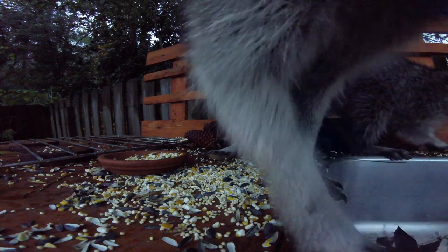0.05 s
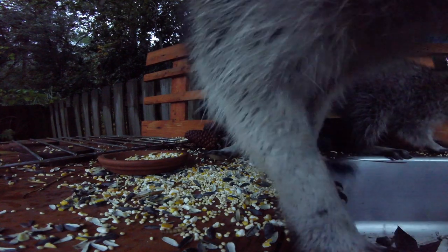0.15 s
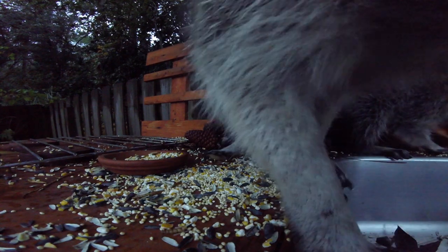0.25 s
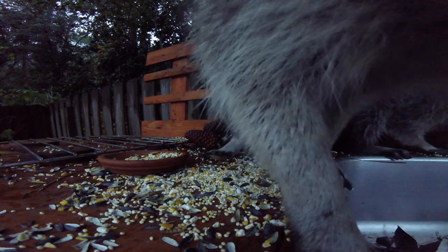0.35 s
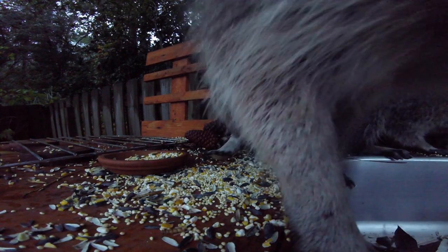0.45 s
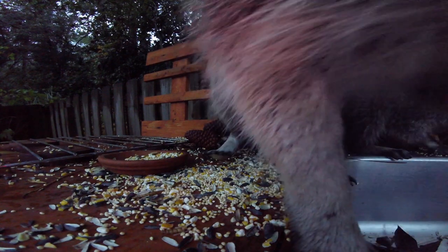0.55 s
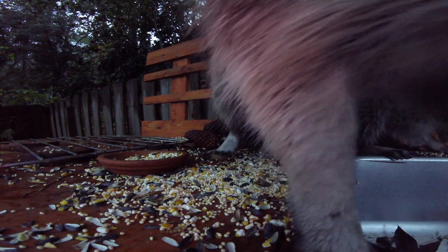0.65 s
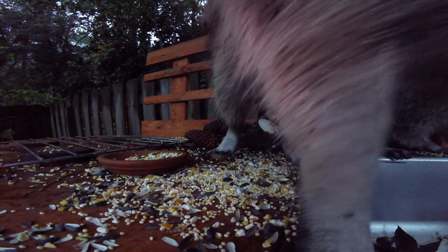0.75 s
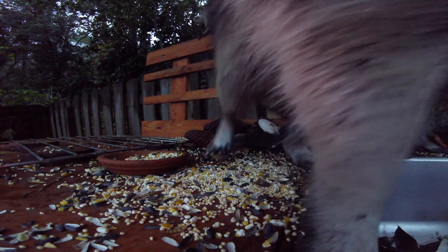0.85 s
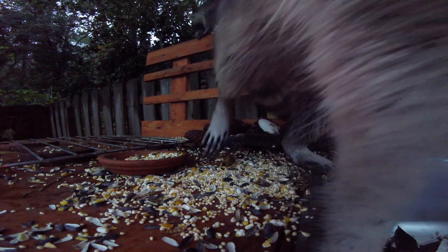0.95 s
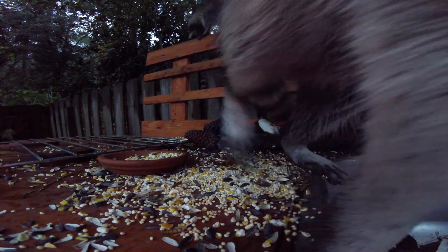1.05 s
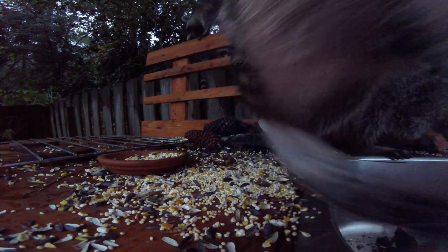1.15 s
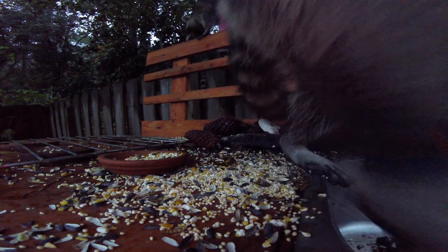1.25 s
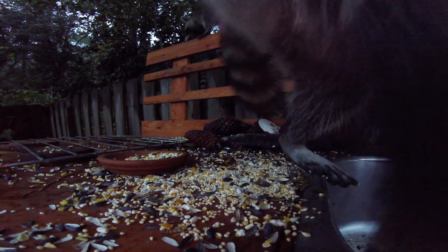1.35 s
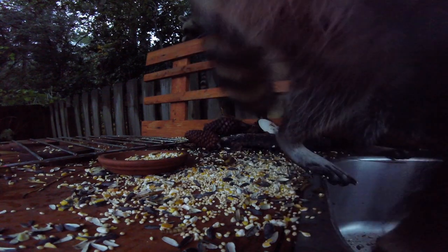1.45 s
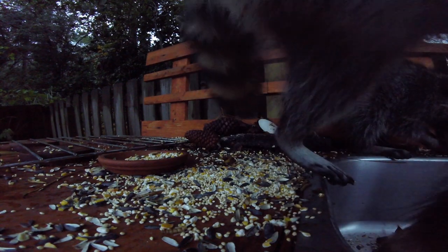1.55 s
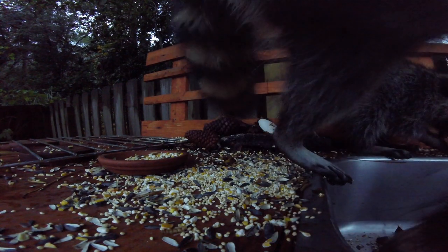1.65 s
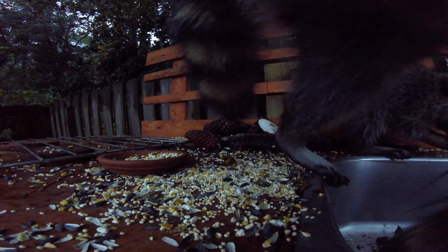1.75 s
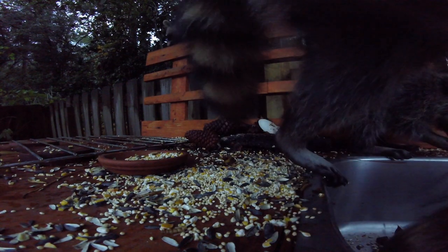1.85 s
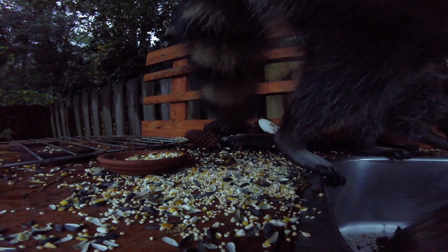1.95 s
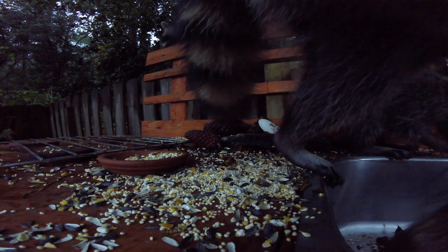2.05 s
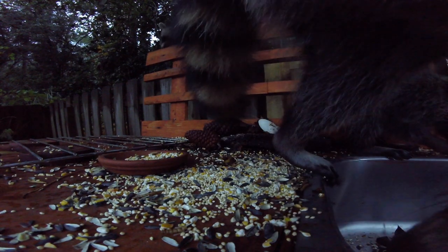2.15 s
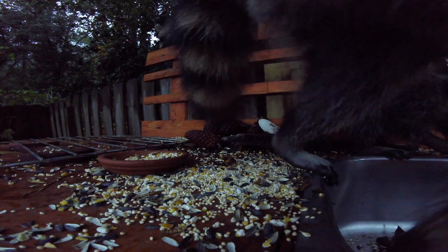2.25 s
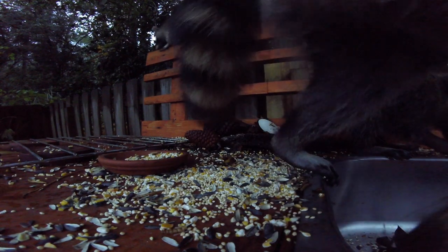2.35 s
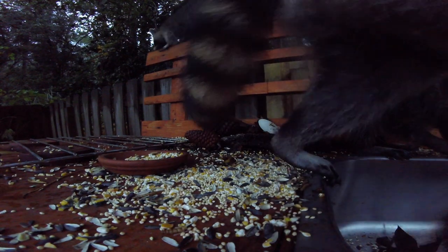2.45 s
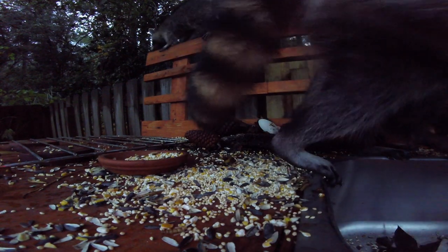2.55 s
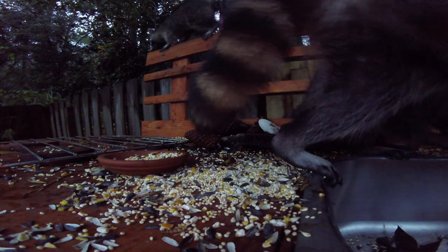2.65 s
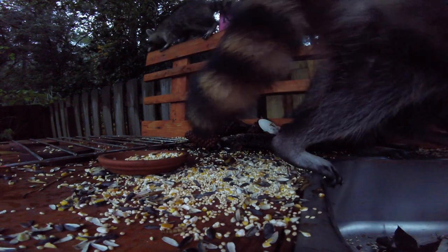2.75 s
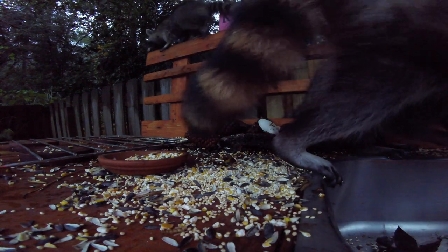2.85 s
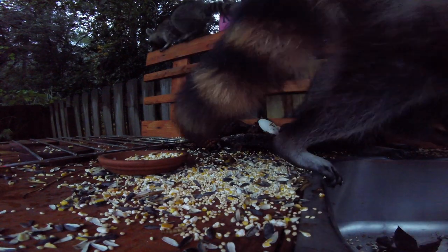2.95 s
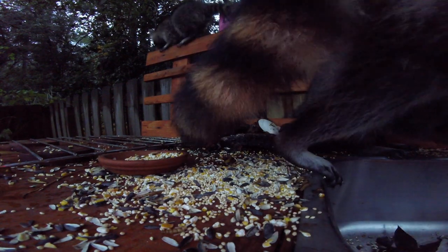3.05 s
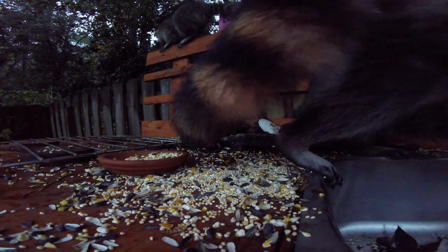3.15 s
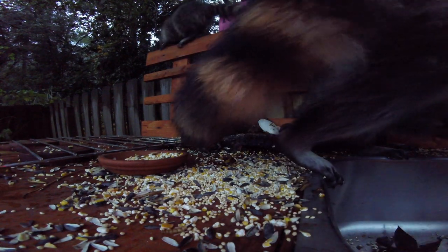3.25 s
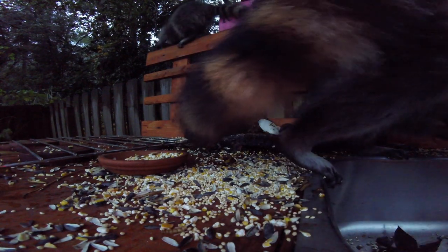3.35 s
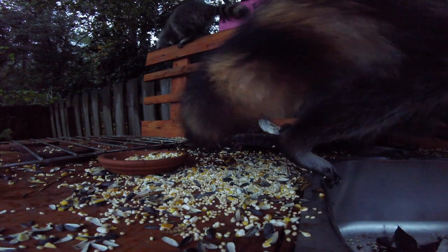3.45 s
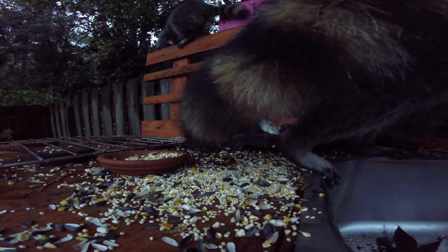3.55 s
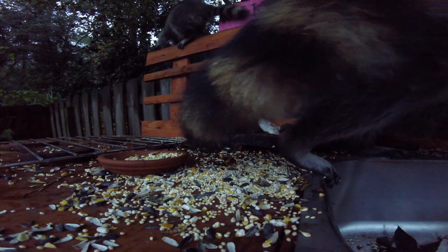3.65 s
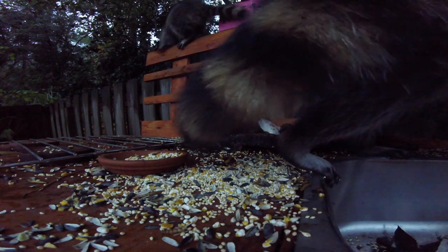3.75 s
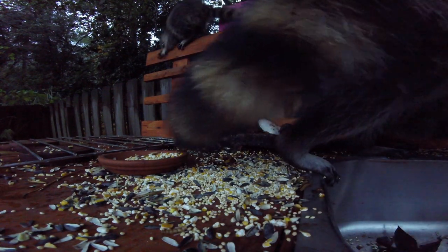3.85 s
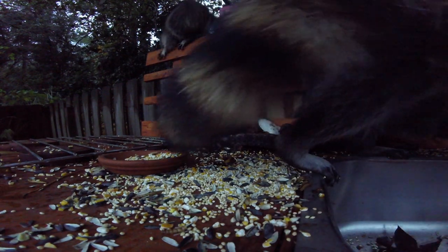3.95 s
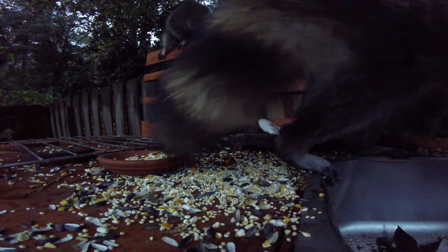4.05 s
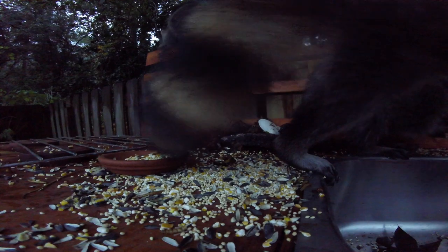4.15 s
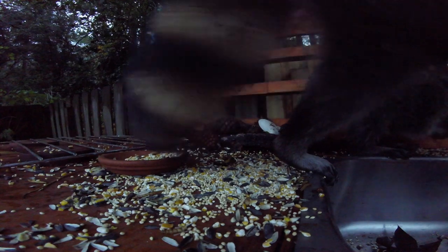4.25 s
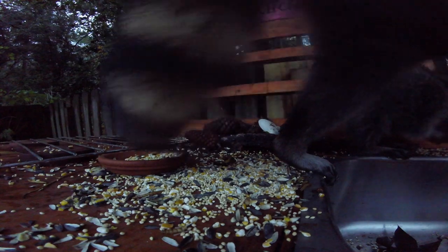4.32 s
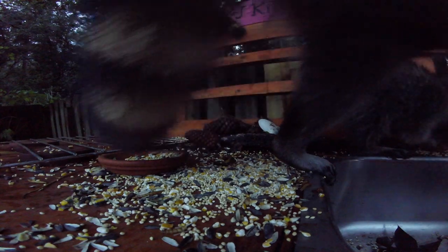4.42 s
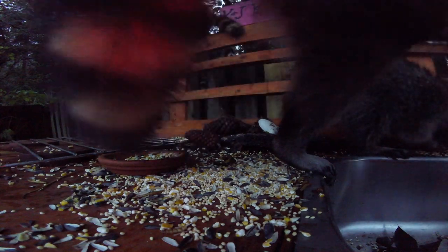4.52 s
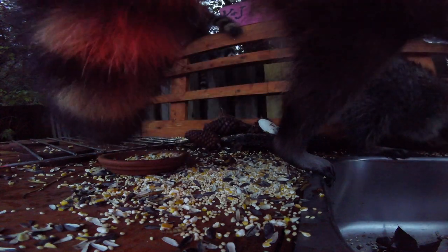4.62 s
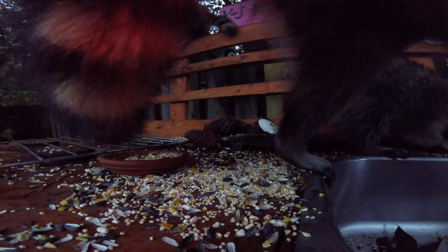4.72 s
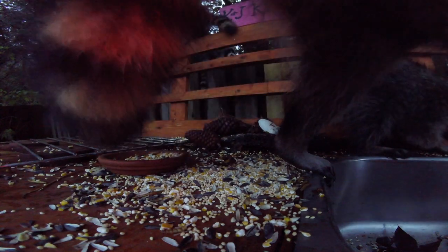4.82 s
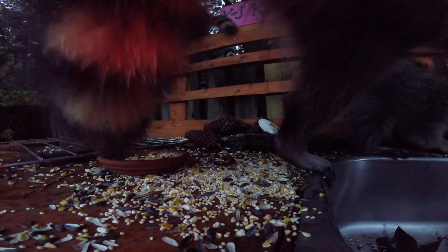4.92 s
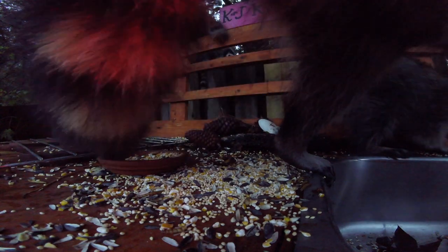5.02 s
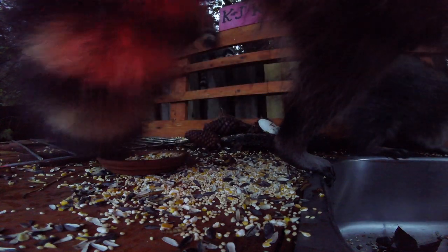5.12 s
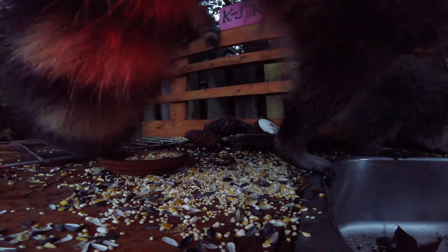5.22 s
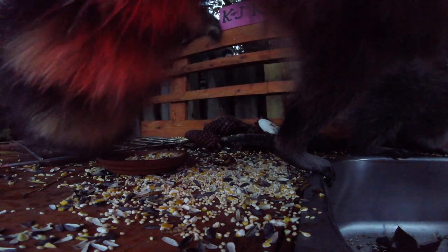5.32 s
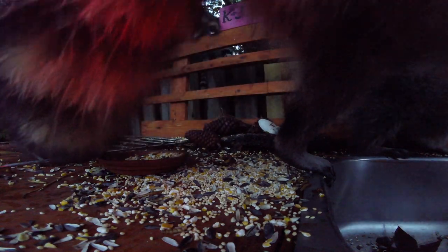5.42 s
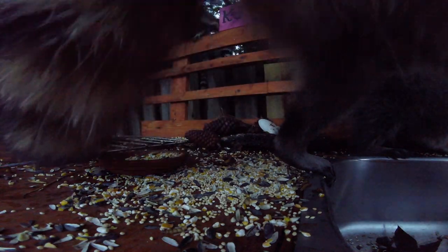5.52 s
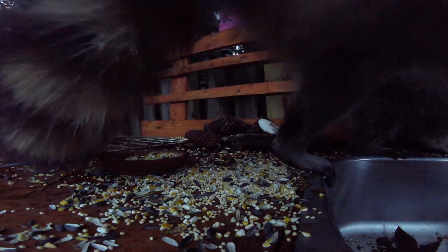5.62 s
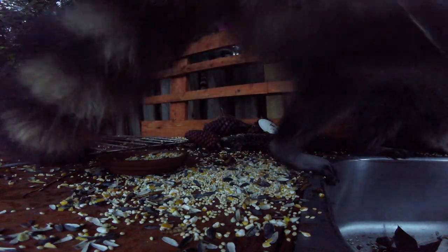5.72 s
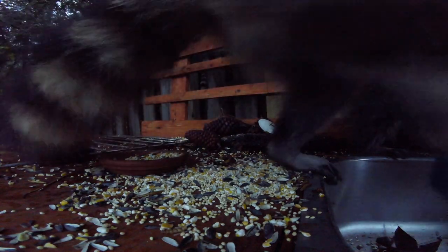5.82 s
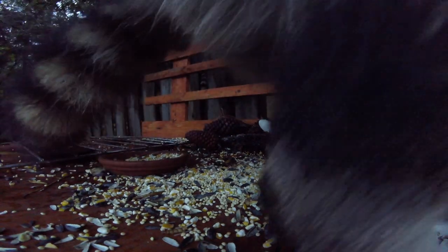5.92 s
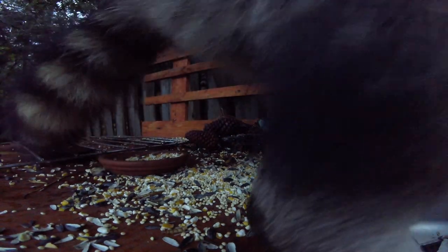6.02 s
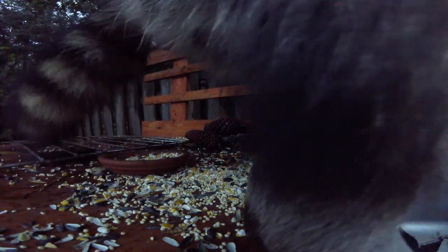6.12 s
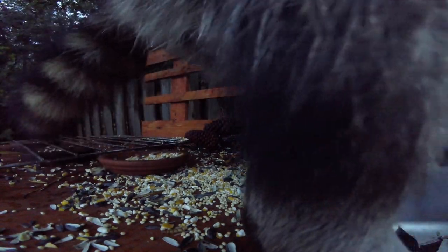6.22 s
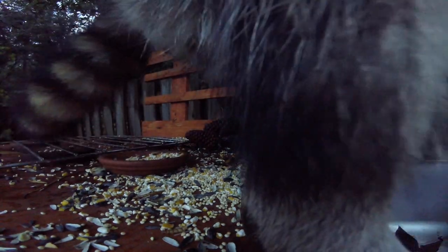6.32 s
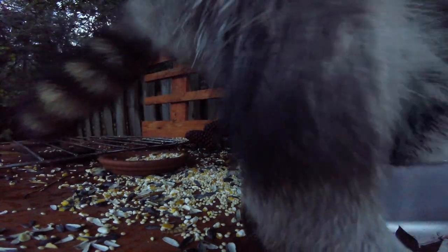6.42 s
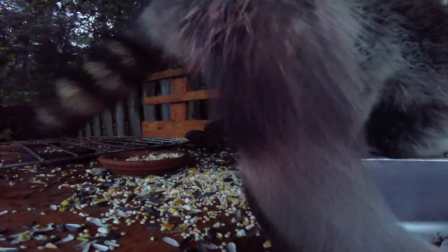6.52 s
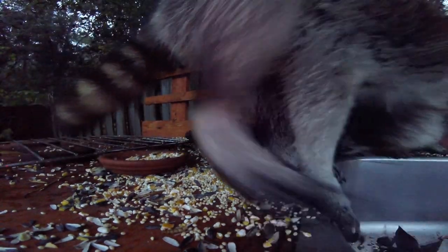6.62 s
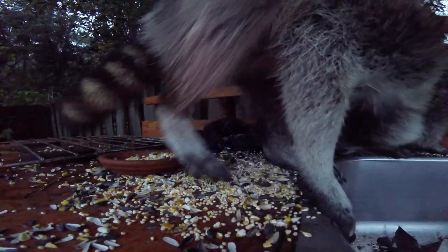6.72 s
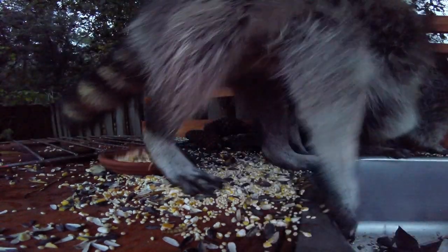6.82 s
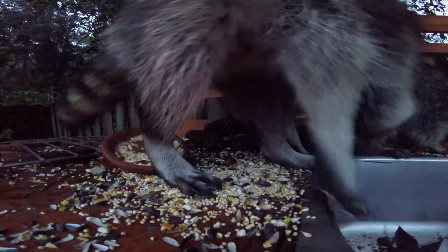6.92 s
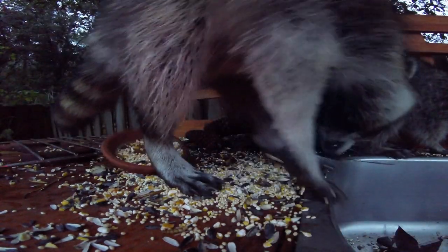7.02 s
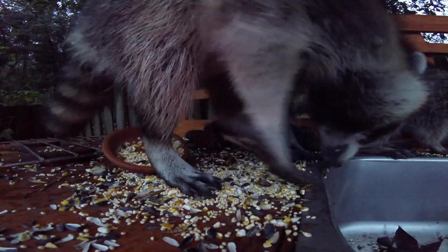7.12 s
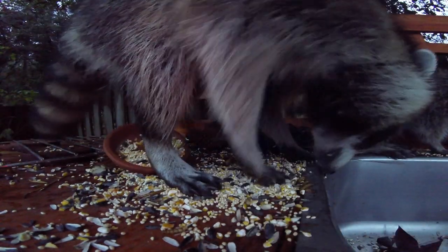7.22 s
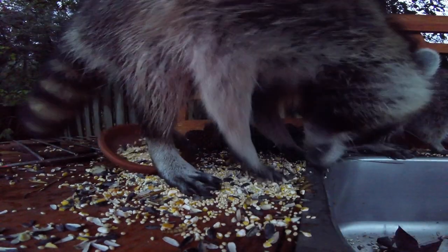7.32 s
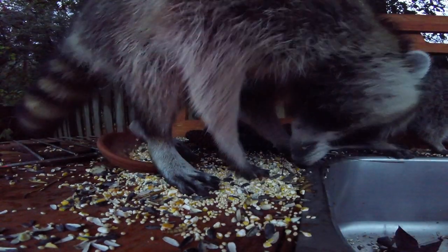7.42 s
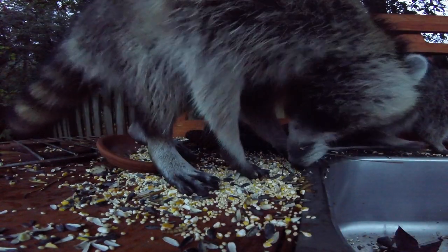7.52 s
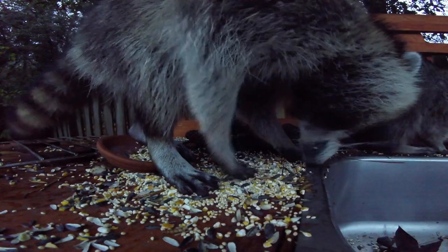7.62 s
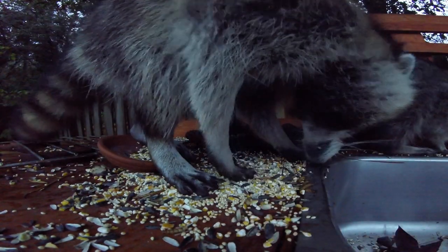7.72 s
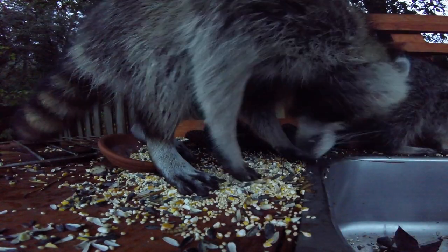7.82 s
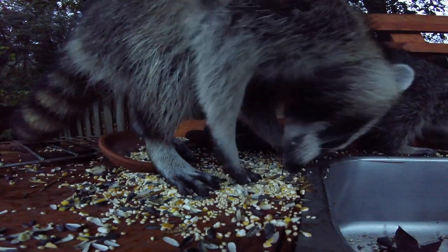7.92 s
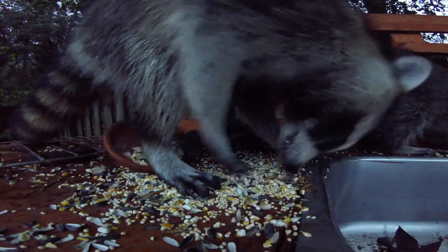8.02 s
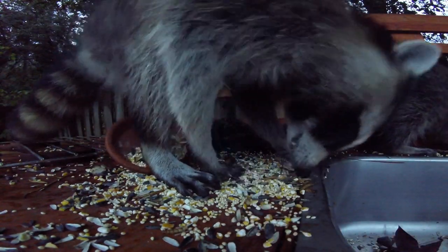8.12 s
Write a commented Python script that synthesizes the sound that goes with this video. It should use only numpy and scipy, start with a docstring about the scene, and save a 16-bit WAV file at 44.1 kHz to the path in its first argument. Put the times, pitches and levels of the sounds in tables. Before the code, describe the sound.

Outdoors on a wooden deck, paws make muffled bassy thumps while seeds snap, tick and rustle right beside the microphone. The opening seed spill rattles lightly in a steel tray; the middle is quieter and sparse. Later, stronger footfalls and claws clank the tray, with barely audible squeaks, before rustling settles. The sound is mono, dry and slightly treble-coloured.

```python
"""Raccoons foraging on a deck

Raccoons forage in birdseed on a wooden deck, close to a small microphone that stands on the boards.
Paws thump the deck as swinging, decaying tones; claws knock a steel tray and ring its modes; it also squeaks.
Seeds crack as bursts of spiky noise, tick as short tones and rustle as dense tiny grains.
Distant rumble and evening air are coloured noise; the microphone port colours everything."""
import sys
import numpy as np
from scipy import signal
from scipy.fft import rfft, irfft
from scipy.io import wavfile
from scipy.ndimage import uniform_filter1d

SR = 44100
rng = np.random.default_rng(int(sys.argv[2]) if len(sys.argv) > 2 else 0)


def persist_wave(psi):
    """Save psi, clipped to +-1, as 16-bit WAV."""
    counts = np.round(np.clip(psi, -1, 1) * 32767).astype(np.int16)
    wavfile.write(sys.argv[1], SR, np.atleast_2d(counts).T)


N = 360297  # length of the scene in samples

# ways the steel tray vibrates: [f/Hz, relative level/dB, time to fall 60 dB/s]
TRAY_MODES = [(275, -12, .06), (289, -26, .42), (445, 0, .045), (360, -12, .05), (590, -12, .05),
              (845, -22, .08), (950, -25, .05), (1240, -29, .06), (1500, -28, .06), (2300, -31, .04),
              (2800, -30, .04)]


def undb(db):
    """Turn decibels into an amplitude factor."""
    return 10 ** (np.asarray(db) / 20)


def unit(x):
    """Scale a sound to an average (RMS) level of 1."""
    return x / np.sqrt(np.mean(x ** 2))


def add(out, start_s, sound):
    """Mix a sound in from the given time."""
    i = max(int(start_s * SR), 0)
    out[i:i + len(sound)] += sound[:len(out) - i]


def fall_60db(t, t60):
    """Exponential decay that drops 60 dB in t60 seconds."""
    return np.exp(-np.log(1000) * t / max(t60, .003))


def ring(hz, t60, seconds=.6):
    """One way of vibrating: a sine that dies away."""
    t = np.arange(int(seconds * SR)) / SR
    return np.sin(2 * np.pi * hz * t) * fall_60db(t, t60)


def ring_modes(modes):
    """A solid object rings in several modes at once."""
    return sum(undb(db) * ring(hz, t60) for hz, db, t60 in modes)


def struck(sound, contact_s):
    """A softer blow pushes longer and rings fewer highs; the result peaks at 1."""
    push = np.hanning(max(int(contact_s * SR), 1) + 2)[1:-1]
    y = signal.fftconvolve(sound, push)
    return y / np.max(np.abs(y))


def band(x, lo_hz, hi_hz):
    """Keep only the frequencies between two limits."""
    return signal.sosfilt(signal.butter(2, [lo_hz, hi_hz], "band", fs=SR, output="sos"), x)


def high_pass(x, order, hz):
    """Cut the frequencies below a limit."""
    return signal.sosfilt(signal.butter(order, hz, "high", fs=SR, output="sos"), x)


def walk(rate):
    """Random levels, each held 1 / rate seconds, then smoothed twice into slow swells."""
    hold = int(SR / rate)
    steps = np.repeat(rng.standard_normal(N // hold + 1), hold)
    smooth = uniform_filter1d(uniform_filter1d(steps, hold), hold)
    return unit(smooth[:N])


def paws():
    """The weight comes on over a cycle or two; the boards swing until the paw settles and damps them."""
    # paws set down: [t/s at about mid-rise, peak level/dB, f/Hz, swing time/s]
    steps = [(0.017, -36, 53, .075), (0.153, -31, 53.2, .06), (0.736, -32.5, 62.4, 0.08),
             (0.974, -41.5, 38.7, 0.058), (1.062, -40, 68.4, 0.046), (1.185, -38, 71.6, 0.042),
             (1.272, -41, 54.4, 0.071), (1.536, -41, 62.6, 0.087), (2.085, -37, 70.2, 0.082),
             (3.15, -47, 44.7, 0.073), (3.34, -39, 43, 0.14), (3.426, -41.5, 44.6, 0.048),
             (3.864, -38.5, 67, .03), (4.119, -41.5, 70, 0.042), (4.534, -40.5, 55.4, 0.053),
             (4.86, -45, 38.2, .09), (5.513, -43.5, 61.2, 0.07), (5.894, -22.5, 77, 0.02),
             (5.916, -28.5, 58.4, 0.027), (6.567, -38.5, 63, 0.086), (6.826, -24.5, 68.6, 0.1),
             (7.163, -32.5, 64.6, 0.029), (7.228, -33.5, 61.4, 0.052), (7.389, -23.5, 64, 0.077),
             (7.685, -36, 63.7, 0.1), (8.04, -38.5, 64, 0.078)]
    # ways the deck boards vibrate: [f/Hz, relative level/dB, time to fall 60 dB/s]
    deck_modes = [(62.4, 1, 0.41), (102, 6.5, 0.12), (121, 4, 0.099), (175, -30, 0.39)]
    rise_s = 0.0227
    out = np.zeros(N)
    boards = ring_modes(deck_modes)
    t = np.arange(len(boards)) / SR
    rise = 1 - np.exp(-(t / rise_s) ** 2)
    for s, db, hz, swing_s in steps:
        swing = np.sin(2 * np.pi * hz * t) * np.exp(-(t / swing_s) ** 2)
        thud = (0.72 * boards + swing) * rise
        add(out, s - rise_s / 2, undb(db) * thud / np.max(np.abs(thud)))
    return out


def pitched(table, t60, rough, spread):
    """Brief rings: a mode, a close neighbour and noise around them."""
    out = np.zeros(N)
    noise = rng.standard_normal((len(table), 6000))
    fade = fall_60db(np.arange(noise.shape[1]) / SR, t60)
    for (s, db, hz), n in zip(table, noise):
        grit = unit(band(n, hz / spread, hz * spread)) * fade
        pair = ring(hz, t60)[:len(n)] + 0.35 * ring(hz * 1.09, t60)[:len(n)]
        add(out, s, undb(db) * struck(pair + rough * grit, contact_s=0.00019))
    return out


def taps():
    """Dull taps on the wood ring with a lot of wide noise around the pitch."""
    # taps: [t/s, peak level/dB, f/Hz]
    tap_list = [(0.175, -41, 151), (0.273, -35, 818), (0.719, -36, 183), (2.309, -45.5, 220),
                (3.058, -48.5, 657), (3.408, -51, 234), (3.775, -50, 226), (3.785, -50, 477),
                (3.799, -55, 226), (3.858, -49.5, 325), (3.889, -48, 282), (4.201, -50.5, 594),
                (4.635, -49.5, 242.6), (4.865, -46, 198), (5.133, -49.5, 219), (5.89, -27.5, 148),
                (5.903, -39.5, 190), (6.577, -49.5, 728)]
    return pitched(tap_list, t60=0.15, rough=0.69, spread=1.98)


def tray_knocks():
    """Every knock rings the same modes, without deep bass: the claw clicks and loose seed jumps."""
    # claws on the tray rim: [t/s, peak level of the ringing/dB, contact length/s]
    knocks = [(6.8138, -34, 0.001), (6.8232, -23.5, 0.0033), (6.836, -33, 0.0011), (6.847, -22, 0.0028),
              (6.873, -40, 0.0014), (6.893, -36.5, .0012), (7.278, -38.5, 0.0017), (7.34, -42.5, .0012),
              (7.3624, -16.5, 0.0018), (7.3699, -14, 0.00059), (8.029, -46.5, 0.002),
              (8.147, -35.5, 0.00093)]
    out = np.zeros(N)
    modes = high_pass(ring_modes(TRAY_MODES), 4, 240)
    noise = rng.standard_normal((len(knocks), 6000))
    for (s, db, contact_s), n in zip(knocks, noise):
        add(out, s, undb(db) * struck(modes, contact_s))
        after = np.arange(len(n)) / SR
        click = unit(band(band(n, 900, 3200), 900, 3200)) * np.exp(-after / .003)
        jump = unit(band(n, 380, 1430)) * np.exp(-after / 0.03)
        add(out, s, undb(db) * (undb(-23) * click + undb(-33.0) * jump))
    return out


def tray_squeaks():
    """The tray squeaks faintly as it shifts: a narrow band of noise that throbs."""
    # squeaks: [t/s, f/Hz, level before fading and throbbing/dB, length/s]
    squeaks = [(6.89, 5350, -63, .02), (7.268, 5350, -63, .045), (7.27, 4400, -70, .07),
               (7.372, 5350, -65, .02), (7.37, 4400, -71, .04)]
    out = np.zeros(N)
    for s, hz, db, length in squeaks:
        t = np.arange(int(length * SR)) / SR
        throb = 1 + 0.3 * np.cos(2 * np.pi * 65 * t)  # the shaking deck opens and closes the contact
        scrape = unit(band(rng.standard_normal(len(t)), hz / 1.015, hz * 1.015))
        fade_in_out = np.sin(np.pi * t / length) ** .5
        add(out, s, undb(db) * fade_in_out * throb * scrape)
    return out


def crack_bursts(table):
    """Splinters: spiky noise with a sharp front and a weaker, longer tail; each husk has its own ring."""
    bright_db, duller_db_per_s = -17, 150  # longer cracks have less of the top part
    out = np.zeros(N)
    noise = rng.standard_normal((len(table), 2, 8000))
    t = np.arange(noise.shape[2]) / SR
    front = 1 - np.exp(-t / 0.00041)
    snap = 1.9 * np.exp(-t / 0.002)  # the husk splits
    for (s, db, low_db, hz, t60), (hiss, wander) in zip(table, noise):
        fall = np.log(1000) * t / max(t60, .004)
        shape = front * (snap + np.exp(-fall) + 0.37 * np.exp(-fall / 3))
        # random jumps in level make the noise spiky
        spikes_db = 2.94 * uniform_filter1d(wander, size=60) * np.sqrt(60)
        splinters = hiss * undb(spikes_db)
        middle = unit(band(splinters, 3980, 7440))
        husk_ring = 0.73 * unit(band(splinters, hz / 1.065, hz * 1.088))
        low = undb(low_db) * unit(band(splinters, 1240, 2980))
        top = undb(bright_db - duller_db_per_s * t60) * unit(band(splinters, 9400, 12900))
        burst = shape * (middle + husk_ring + low + top)
        add(out, s, undb(db) * burst / np.max(np.abs(burst)))
    return out


def cracks():
    """Seeds crack at set times, each as a burst of splinters."""
    # cracks: [t/s, peak level/dB, low part against the middle/dB, husk ring f/Hz, main 60 dB fall/s]
    crack_list = [(0.077, -41, 4, 5170, 0.021), (0.1315, -50, -10, 5030, .065),
                  (0.157, -56, -12, 4700, .045), (0.276, -24, -1, 5100, .065),
                  (0.281, -25.5, -11, 6400, 0.038), (0.305, -42, -5, 6400, 0.071),
                  (0.3367, -43, -5, 5000, .1), (0.362, -43, -5, 6450, 0.055),
                  (0.4058, -42, -1, 4670, 0.044), (0.4567, -47, -7, 5060, 0.072),
                  (0.6998, -51, -6, 5500, .045), (0.727, -49.5, -5, 5460, 0.039),
                  (0.965, -47, -1, 5400, 0.018), (0.9967, -48, -10, 5190, 0.03), (1.079, -49, 8, 3000, .03),
                  (1.156, -49, -1, 5650, .04), (1.1878, -38.5, -3, 4800, 0.047),
                  (1.3668, -50, -8, 5740, .035), (1.44, -51, 9, 3000, .03), (1.53, -53, -10, 4000, .03),
                  (1.5875, -55, -17, 2870, 0.03), (1.8053, -52, -12, 5100, .04),
                  (2.1924, -53, -15, 4530, .04), (2.802, -52, -13, 5700, 0.068),
                  (2.864, -38.5, -3.5, 2900, 0.065), (2.9476, -35, -12, 6600, 0.051),
                  (3.034, -46, 2, 5430, .035), (3.0605, -43.5, 0, 3400, 0.072),
                  (3.1188, -55, -14, 4500, .03), (3.133, -41, -2.5, 4800, 0.096),
                  (3.4301, -49.5, -17, 4870, 0.031), (3.6064, -50.5, -17, 5000, 0.028),
                  (3.657, -51, -15, 4610, .03), (3.706, -46.5, -10, 5500, .04),
                  (3.7658, -49.5, -13, 3900, .022), (3.8631, -46.5, -12, 3570, 0.051),
                  (4.1555, -52, -16, 5140, .04), (4.2013, -47, -28, 5030, 0.062),
                  (4.435, -40, -11, 2980, 0.043), (4.4411, -35.5, -16, 4360, 0.043),
                  (4.278, -54, -8, 4000, 0.018), (4.56, -48, 3, 5350, .04), (4.6047, -46, -13, 4130, 0.058),
                  (4.8858, -49, -1, 5200, 0.036), (5.378, -53.5, -22, 3670, .04),
                  (5.667, -51.5, -5, 3120, 0.26), (5.8785, -26.5, -8, 4800, 0.047),
                  (5.903, -36.5, 12, 2800, .02), (5.9113, -40.5, -7, 3590, 0.039),
                  (5.9554, -49, 3, 3150, 0.087), (5.977, -36.5, -0.5, 4830, .02),
                  (6.0023, -43, -5, 5940, .035), (6.127, -48.5, -9, 5870, .05),
                  (6.2781, -48, 4, 4720, 0.032), (6.315, -43.5, -5, 5200, .05),
                  (6.3658, -48, -8, 5470, .045), (6.4038, -47.5, -10, 4530, 0.046),
                  (6.4158, -39.5, -15, 4930, 0.044), (6.5896, -42, -2, 2880, 0.071),
                  (6.6131, -38, -6.5, 4700, 0.015), (6.7946, -45.5, -4, 5020, 0.14),
                  (6.8463, -49, -2, 2850, 0.016), (6.895, -41, 2, 2950, 0.023),
                  (6.912, -47, -15, 5560, .03), (6.941, -47, -17, 4250, 0.033),
                  (7.035, -51, -15, 2960, .04), (7.0988, -52, 5, 4520, 0.032), (7.1681, -51, -4, 5520, .15),
                  (7.9039, -55, -8, 4890, .04), (8.0733, -46.5, -4, 5350, 0.1)]
    return crack_bursts(crack_list)


def faint_cracks():
    """Small seeds crack at chance moments, each with its own size and ring."""
    per_s, middle_db, low_db, t60 = 3.5, -58.5, -16, 0.023
    lowest_hz, highest_hz = 3500, 5830
    when, size, ring_at = rng.random((int(per_s * N / SR), 3)).T
    times = when * N / SR
    levels_db = middle_db + 8 * (size - .5)
    rings_hz = lowest_hz + (highest_hz - lowest_hz) * ring_at
    table = [(s, db, low_db, hz, t60) for s, db, hz in zip(times, levels_db, rings_hz)]
    return crack_bursts(table)


def seed_ticks():
    """Short ticks ring at a clear pitch, with noise kept close around it."""
    # ticks: [t/s, peak level/dB, f/Hz]
    tick_list = [(0.077, -46, 932), (0.276, -42, 790), (0.406, -52, 767), (0.724, -52.5, 880),
                 (1.08, -49.5, 1420), (1.189, -55, 850), (2.866, -51, 1443), (2.952, -47, 2900),
                 (3.034, -55, 1650), (3.183, -48.5, 1430), (3.375, -52, 1700), (3.429, -50.5, 1790),
                 (3.706, -49.5, 2020), (4.006, -47.5, 1320), (4.205, -53, 1750), (4.436, -54, 2750),
                 (5.758, -57, 851), (5.863, -51, 800), (5.881, -41, 836), (5.902, -39, 887),
                 (5.92, -45, 695), (6.317, -51, 1880), (6.399, -55, 1670), (6.527, -51, 1670),
                 (6.579, -43, 790), (6.815, -46.5, 885), (6.834, -44, 880), (6.875, -45, 2330),
                 (6.85, -40.5, 2410), (7.369, -53, 925)]
    return pitched(tick_list, t60=0.071, rough=0.81, spread=1.167)


def rattle(seed, from_s=.27, until_s=.6):
    """The first scatter of seed lands in the tray and rings its upper modes."""
    # these modes ring 1.8 times as long here as under a knock
    upper = ring_modes([(hz, db, 1.8 * t60) for hz, db, t60 in TRAY_MODES[5:]])
    t = np.arange(N)
    thrown = seed * (t > from_s * SR) * (t < until_s * SR)
    return undb(-9.5) * signal.fftconvolve(thrown, upper / np.sqrt(np.sum(upper ** 2)))[:N]


def grains(per_s, lo_hz, hi_hz):
    """Dense tiny seeds of uneven size, each with a hissing tail."""
    sizes = undb(2.5 * rng.exponential(size=N))
    hits = (rng.random(N) < per_s / SR) * sizes
    tail_s = 0.0045
    swell = signal.lfilter([1], [1, -np.exp(-1 / (tail_s * SR))], hits)
    return unit(band(swell * rng.standard_normal(N), lo_hz, hi_hz))


def rustle():
    """Slow sifting with brief brushes on top; heavier grains sound lower."""
    # paws and snouts sifting seed: [t/s, light grains level/dB, heavy against light/dB]
    sifting = [(0.0, -69, 8.5), (0.29, -78, -10), (1.34, -72, 2.5), (2.11, -88, -16), (2.64, -77, -10),
               (3.03, -71, -7), (3.84, -76.5, 7), (4.25, -81, -13), (4.57, -70, -10), (4.92, -76, -24),
               (5.85, -73, 5.5), (6.67, -81.5, 3), (7.01, -72, 1.5), (7.299, -68.5, 0), (7.5, -76.5, -4),
               (8.17, -81, 13)]
    # paws brushing through seed: [t/s, light grains level/dB, heavy against light/dB]
    scuffs = [(0.05, -69, -16), (0.129, -68, 5), (0.29, -59, -1), (0.339, -57, -4), (0.395, -63, 3.5),
              (0.454, -61, 0.5), (0.505, -70.5, 0), (0.695, -73, 4), (1.24, -72.5, 5), (2.08, -70.5, 5.5),
              (2.158, -70.5, 7.5), (3.694, -70, 0), (3.94, -73, -11), (3.992, -68, -5), (5.882, -66, 12),
              (6.32, -82, 14), (6.517, -65.5, 3.5), (6.823, -71, 13), (6.9, -62.5, -8), (6.985, -76, 9.5),
              (7.163, -65, 3), (7.603, -75, -3), (8.04, -71, -7)]
    scuff_s = 0.058
    times, db, low_db = np.transpose(sifting)
    at = np.arange(N) / SR
    light = undb(np.interp(at, times, db))
    heavy = undb(np.interp(at, times, db + low_db))
    stroke = np.sqrt(np.hanning(int(scuff_s * SR)))
    for s, db, low_db in scuffs:
        add(light, s, undb(db) * stroke)
        add(heavy, s, undb(db + low_db) * stroke)
    return light * grains(300, 4250, 6830) + heavy * grains(200, 390, 3260)


def air():
    """Outdoor noise with a fixed colour; its bass and the rest swell slowly and separately."""
    # colour of the air noise: [f/Hz, level in each 1 Hz of width/dB]
    air_colour = [(25, -80), (45, -69), (63, -69), (90, -75), (130, -84.5), (170, -88.5), (400, -94),
                  (800, -96.5), (1500, -101), (3000, -105), (4200, -112), (5600, -110), (8000, -107),
                  (10500, -114), (14000, -117)]
    hz = np.fft.rfftfreq(N, 1 / SR)
    at, db = np.transpose(air_colour)
    colour = undb(np.interp(np.log(hz + 1), np.log(at), db)) * np.sqrt(SR / 2)
    spectrum = rfft(rng.standard_normal(N)) * colour
    bass_share = 1 / (1 + (hz / 140) ** 4)
    bass = irfft(spectrum * bass_share, N) * undb(2.0 * walk(5.72))
    rest = irfft(spectrum * (1 - bass_share), N) * undb(0.29 * walk(3.63))
    return bass + rest


def scene():
    """Mix wood, tray, seed and air into one channel."""
    wood = paws() + taps()
    tray = tray_knocks() + tray_squeaks()
    seed = cracks() + faint_cracks() + rustle()
    return (wood + tray + seed_ticks() + seed + rattle(seed) + air())[None]


def record(dry):
    """The port in front of the microphone rings in the treble; deep bass and the top are cut."""
    # port resonances: [f/Hz, width/Hz, boost/dB]; a boost of 0 dB changes nothing
    port = [(6513, 317, 9.5), (5000, 490, 0)]
    top_hz = 13700
    out = high_pass(dry, 2, 22)
    for hz, width, db in port:
        resonance = signal.lfilter(*signal.iirpeak(hz, hz / width, SR), out)
        out = out + (undb(db) - 1) * resonance
    return signal.sosfilt(signal.ellip(8, .2, 60, top_hz, fs=SR, output="sos"), out)


dry = scene()
out = record(dry)
persist_wave(out)
```